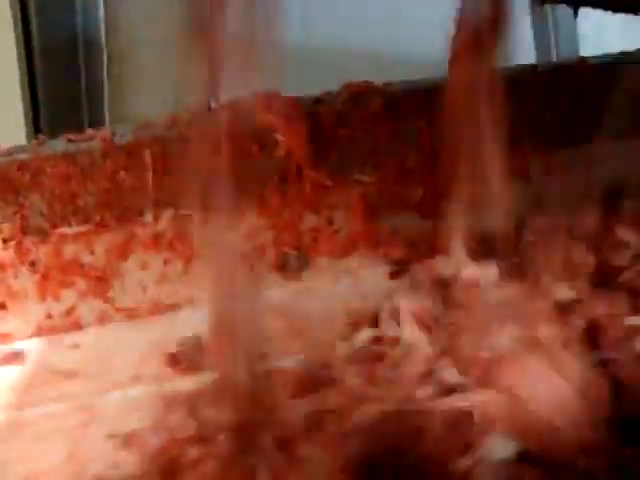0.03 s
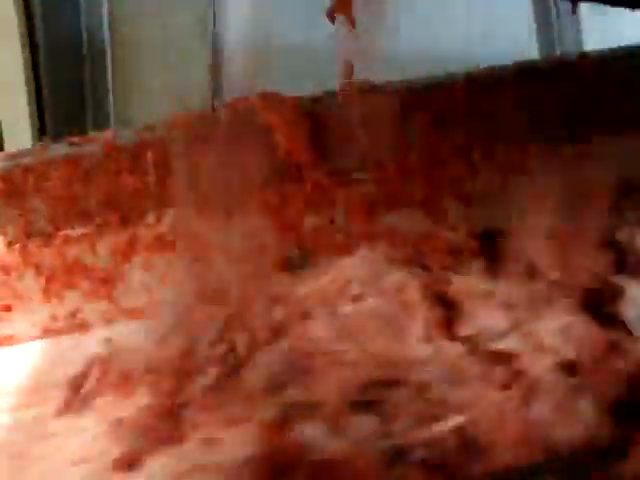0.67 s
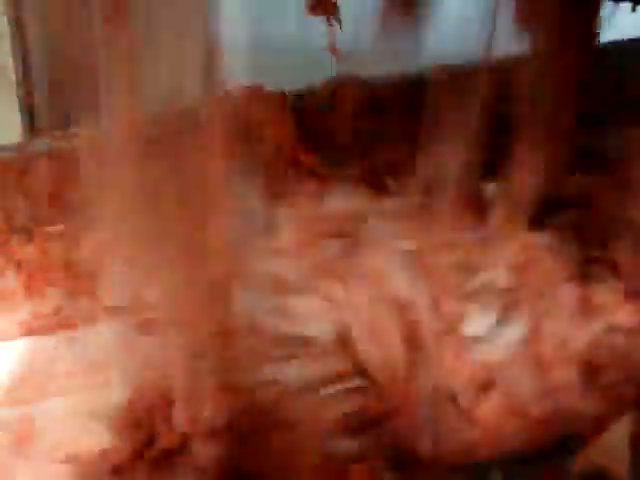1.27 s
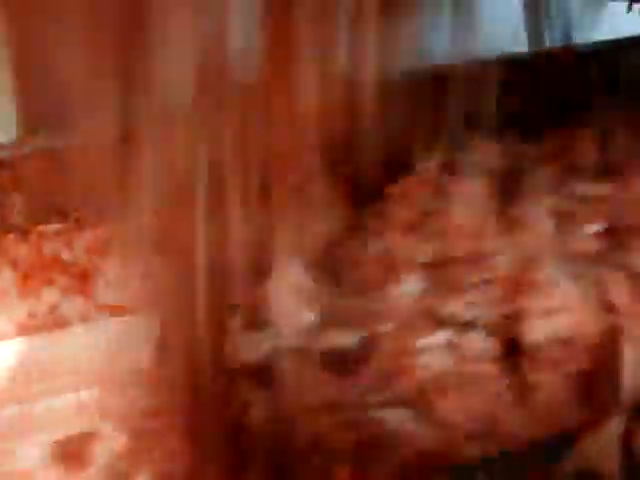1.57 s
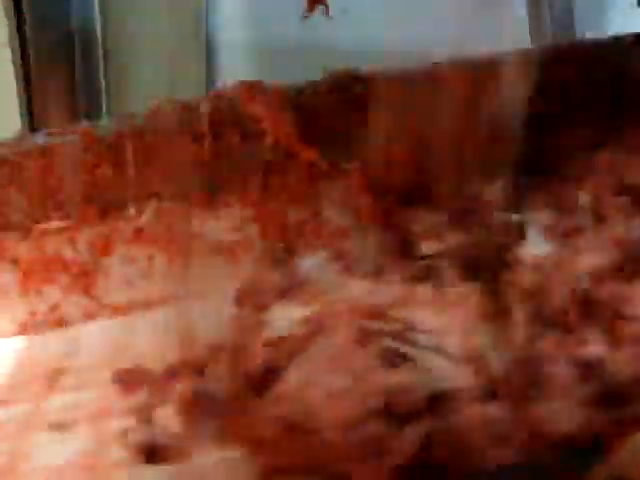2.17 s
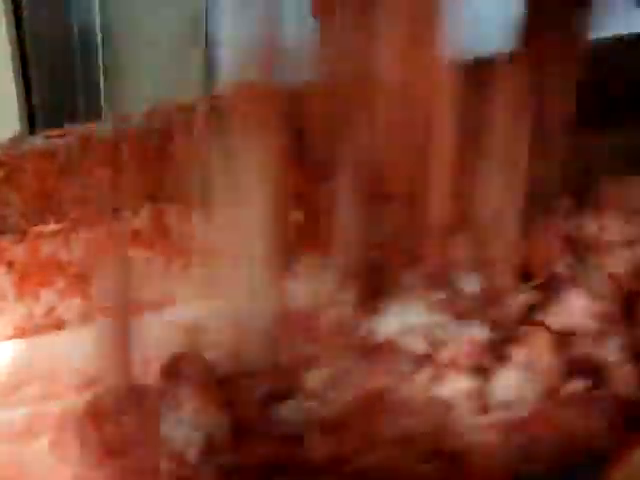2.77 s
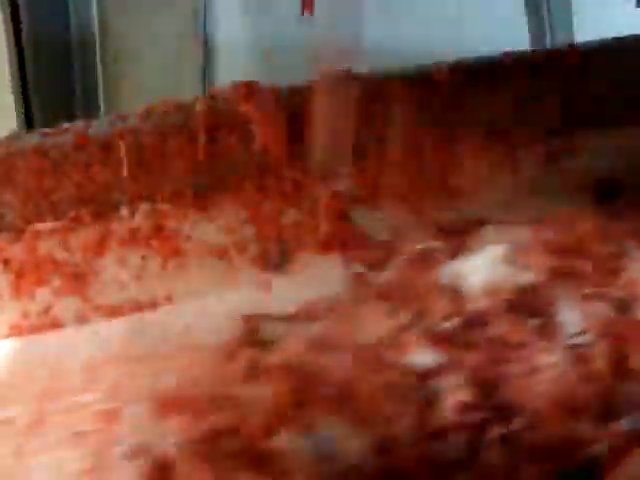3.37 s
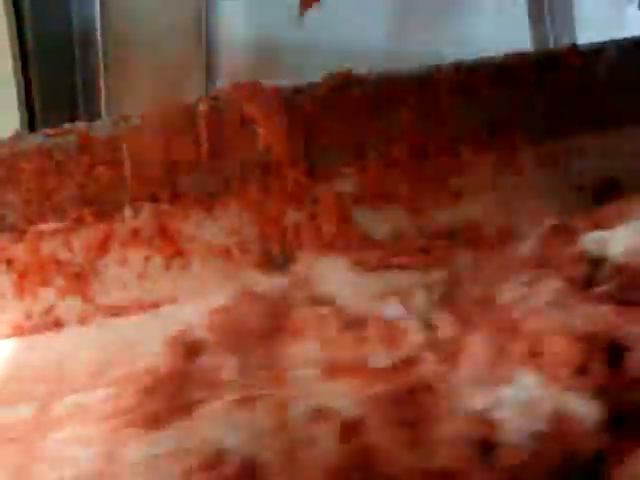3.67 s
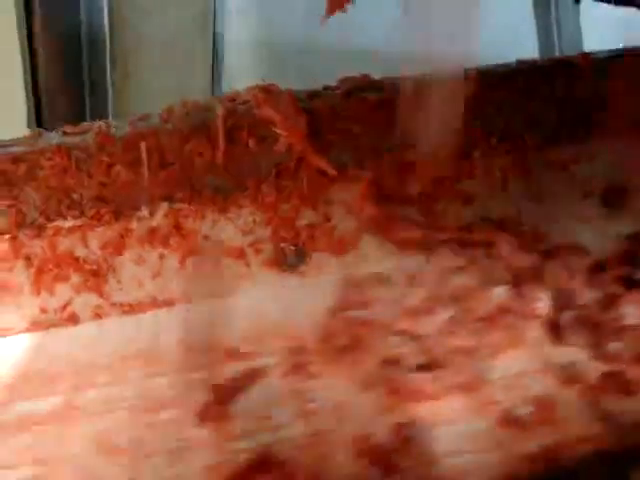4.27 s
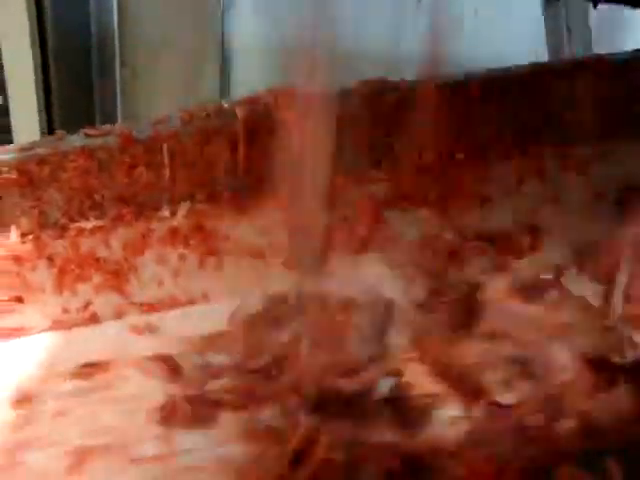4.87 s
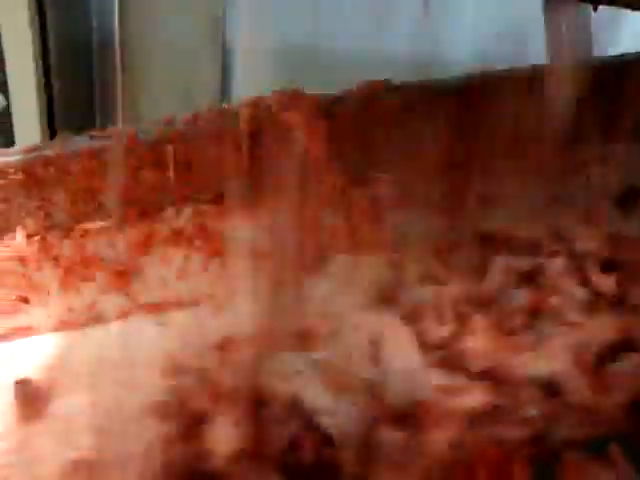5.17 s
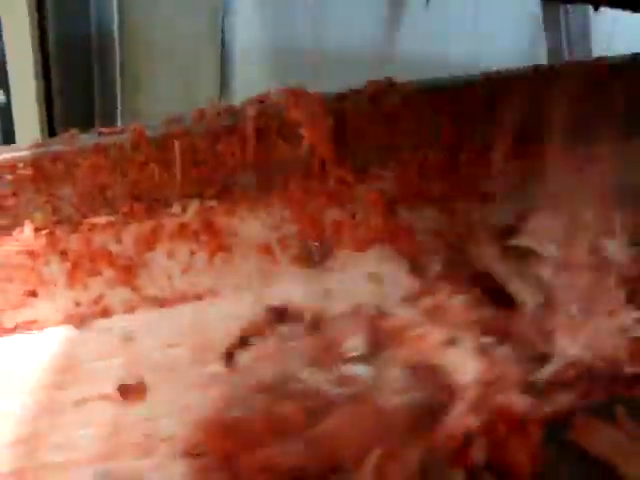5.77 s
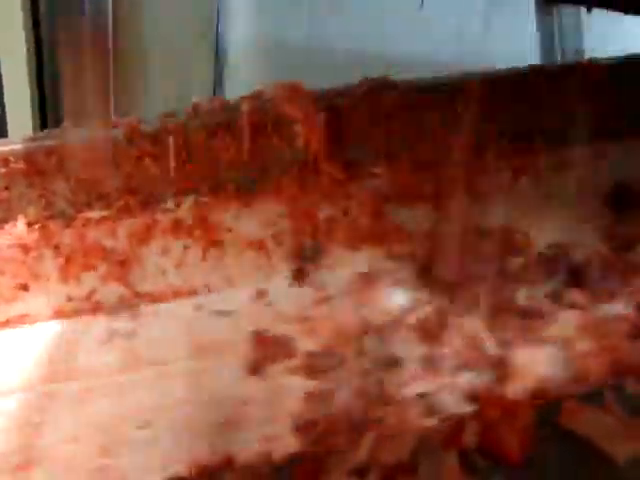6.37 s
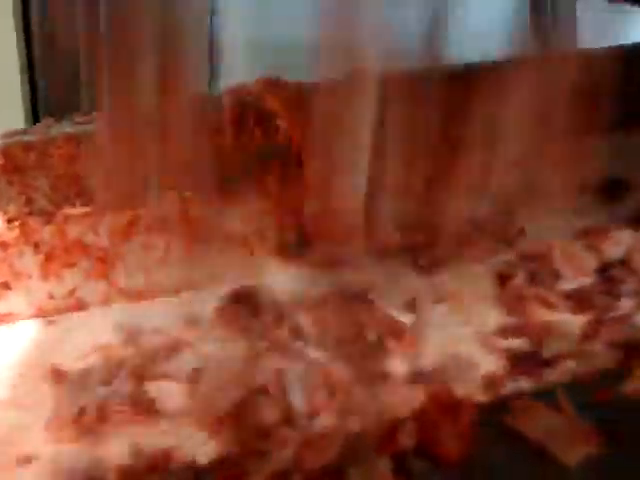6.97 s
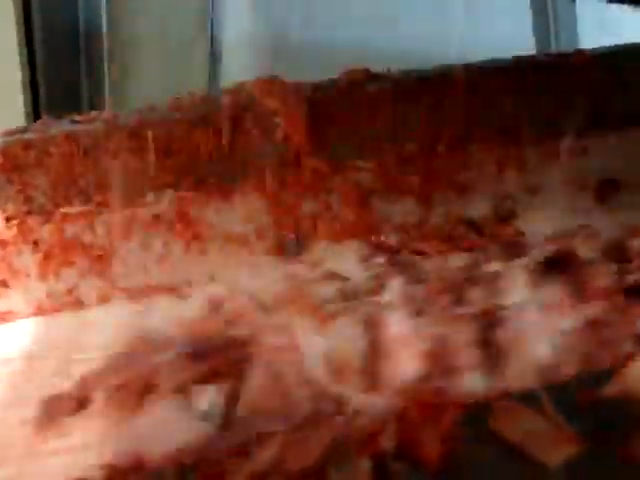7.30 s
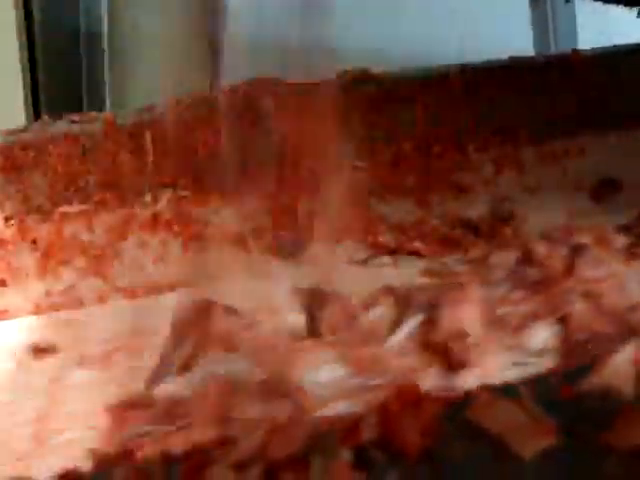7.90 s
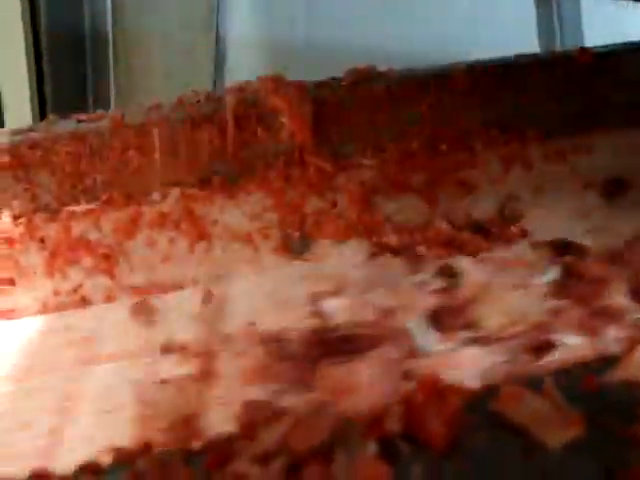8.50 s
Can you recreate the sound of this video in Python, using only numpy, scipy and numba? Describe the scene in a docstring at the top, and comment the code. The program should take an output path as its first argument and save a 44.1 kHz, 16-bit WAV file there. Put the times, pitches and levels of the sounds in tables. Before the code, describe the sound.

Wet scraps splatter and thud into a steel hopper in surges, bones knocking, over a grinder's steady drone.

```python
"""A wet roar comes first: load after load of meat and bone scraps pours into a running twin-shaft grinder.
The roar is countless small splats merging. Big lumps slap down, bones knock, juice spatters and squirts.
The scraps land in the hopper, a steel funnel whose ringing walls colour the impacts.
The machine drones underneath, and a hard-walled hall answers with a short echo."""
import sys
import numpy as np
from scipy import signal
from scipy.fft import rfft, irfft
from scipy.io import wavfile
from scipy.ndimage import uniform_filter1d
from numba import njit

SR = 44100
rng = np.random.default_rng(int(sys.argv[2]) if len(sys.argv) > 2 else 0)


def master(y):
    """Save y as 16-bit WAV."""
    cut = np.clip(np.atleast_2d(y).T, -1, 1)
    pcm = np.round(cut * 32767)  # scale
    wavfile.write(sys.argv[1], SR, pcm.astype(np.int16))


N = 376613

# Levels in the tables are relative: the functions below turn them up or down in the mix.
# The hum of the motor and gears. Each row: pitch in Hz, level in dB.
DRIVE_TONES = [(212, -52), (234, -49), (512, -49), (668, -47)]
# The tone colours of four noises. Each row: frequency in Hz, level in dB.
GEAR_COLOUR = [(25, -17), (70, -15), (115, -13.5), (150, -1), (210, -0.5), (420, 3), (650, 7.5), (790, 1),
               (950, 9), (1500, 5.5), (3000, -4.5), (10000, -59)]  # turning shafts and gears
THUD_COLOUR = [(70, -28), (115, -28), (150, -9), (215, 2.5), (280, 4), (420, -0.5), (650, 7.5), (790, 0),
               (1000, 1.5), (1600, -5.5), (4000, -46)]  # scraps landing on the heap
SPATTER_COLOUR = [(1500, -33.5), (3500, 4.5), (5000, 3), (7500, -0.5), (10000, -7)]  # flying juice
SPLAT_COLOUR = [(120, -49.5), (250, -16.5), (480, -15), (790, -7), (900, -7), (1200, -4), (1450, -3),
                (1800, -3.5), (2600, 0.5), (3300, -4.5), (4500, -9), (6500, -20), (10000, -30)]  # meat hitting
# The notes the steel hopper rings at. Each row: pitch in Hz, width in Hz (narrow rings longer), level in dB.
HOPPER_NOTES = [(229.5, 9.7, -8.5), (519.5, 10.2, 3.5), (643, 31, -5), (703, 52, -6), (740, 48, -10),
                (890, 24, 2), (942, 58, -1), (1025, 63, 0.5), (1118, 41, -1), (1207, 80, -3.5),
                (1336, 76, -8.5), (1633, 37, -3.5), (1983, 110, -5.5)]
# Air and juice squeezed out of a pocket. Each row: start in seconds, pitch in Hz, level in dB.
JUICE_SQUIRTS = [(0.27, 2100, -18), (0.603, 5900, -14), (1.858, 2100, -12), (2.014, 4560, -16.5),
                 (3.313, 4370, -18.5), (6.048, 5400, -18), (6.096, 2080, -16), (6.149, 1420, -16.5),
                 (6.272, 2150, -16), (6.862, 6940, -21), (7.089, 1500, -12), (7.74, 1960, -8.5),
                 (7.855, 5560, -18.5), (8.02, 2280, -8.5)]
# Bones striking the steel. Each row: start in seconds, level in dB, pitch of the bone in Hz.
BONE_KNOCKS = [(0.1933, 0, 1100), (0.7863, -4, 2600), (1.143, -6, 1300), (2.7726, -9, 1900),
               (2.9142, -2, 1970), (3.147, -3, 2250), (3.9093, -4, 2940), (4.2397, -7, 2400),
               (4.7856, -4, 1310), (5.932, 5.5, 1400), (5.951, 10, 880), (7.2665, -1, 2640),
               (7.2787, 1, 2440), (7.454, -5, 1390), (7.546, 3, 2160), (7.855, -3, 2390), (8.018, -2, 2000),
               (8.161, -4, 1700), (8.333, -2, 1870), (8.493, -7, 1200)]
# Big lumps slapping down. Each row: time in seconds, level in dB, spatter in dB relative to that level,
# pitch of the trapped air in Hz.
LUMP_SLAPS = [(0.264, 4, -30, 2020), (0.676, -9, -8, 980), (0.775, -2, -34, 1070), (1.042, -2.5, -31, 1130),
              (1.108, 5.5, -39, 1090), (1.359, 1, -17, 2060), (1.851, -1, -22, 2130),
              (1.975, -17.5, 0.5, 2660), (2.01, -13, -10, 2660), (2.041, -0.5, -22, 996),
              (2.141, -10, -17, 1040), (2.233, 0, -15, 1100), (2.294, -1, -17.5, 1260),
              (2.395, 3, -34, 1020), (2.483, -3, -27, 960), (2.604, 1, -19, 1308), (2.698, 1.5, -22, 980),
              (2.768, 0, -26, 940), (2.815, -2.5, -16, 1110), (2.912, -2, -29, 1220),
              (3.008, -1, -17, 1010), (3.045, -9, -26, 1510), (3.193, -7, -8.5, 1340),
              (3.25, 1.5, -24, 1500), (3.297, -5, -19, 1680), (3.357, -1.5, -26, 2090),
              (3.438, -15.5, -10, 1500), (3.529, -3.5, -13.5, 2030), (3.583, -10, -7, 1020),
              (3.773, -5, -19, 2020), (3.814, -4.5, -11, 1970), (3.946, -14, -7.5, 990),
              (4.055, -1.5, -15.5, 920), (4.084, 2.5, -25, 3370), (4.236, -10, -14, 1270),
              (4.374, -6, -19, 2900), (4.677, 2, -21, 945), (4.784, 3.5, -23, 1070),
              (4.995, -2.5, -17.5, 2040), (5.409, -0.5, -16, 3680), (5.703, 2.5, -37, 1280),
              (5.824, -2, -17, 1210), (5.95, -2, -12, 990), (6.088, 1, -17, 2060), (6.181, -4, -21, 1680),
              (6.265, -9, -23, 2150), (6.388, -3, -12.5, 1180), (6.448, -1.5, -18, 1090),
              (6.62, -2, -30, 1090), (6.728, 2, -25, 2450), (7.004, -4, -22, 1240), (7.087, -1, -36, 1400),
              (7.175, -4.5, -24, 1600), (7.225, -6.5, -15, 2430), (7.359, -7, -15.5, 2380),
              (7.393, -8.5, -11, 1010), (7.453, -0.5, -31, 1130), (7.543, 2.5, -17, 1200),
              (7.689, 4.5, -30, 1220), (7.909, -3, -12, 1160), (7.941, 1.5, -20.5, 1160),
              (8.018, -7.5, -8.5, 1970), (8.048, 1, -23, 1060), (8.21, -7, -20, 1930),
              (8.335, -10, -14, 1840), (8.412, -2, -24, 2250), (8.492, -9, -17, 950)]
# Loads of scraps tipping in. Each row: start in seconds, length in seconds, splat level in dB,
# spatter in dB relative to the splats, thud level in dB, wall ringing in dB.
LOADS = [(0.0, 0.46, -14.5, -13.5, -22.5, -18), (0.507, 0.2, -16, -16.5, -26.5, -27),
         (0.82, 0.34, -15, -14, -20, -19), (1.172, 0.3, -13.5, -15, -24, -20),
         (1.513, 0.2, -11.5, -14, -22.5, -25), (1.759, 0.13, -15.5, -9, -30, -21.5),
         (2.05, 0.099, -20, -11, -26, -26), (2.261, .15, -14.5, -15, -24.5, -28),
         (2.547, 0.16, -17.5, -10.5, -27.5, -21), (2.796, 0.072, -19.5, -4, -50, -36),
         (3.158, 0.17, -26.5, -3, -34, -39), (3.522, 0.18, -12.5, -12.5, -26, -26),
         (4.046, 0.35, -14.5, -10, -41, -24.5), (4.462, .14, -14, -10.5, -39, -27),
         (4.696, 0.23, -15.5, -9.5, -31, -26.5), (4.947, 0.28, -15.5, -11, -33, -27),
         (5.255, .16, -14, -12.5, -33, -29), (5.477, 0.11, -13, -10.5, -29, -36),
         (5.65, 0.23, -19.5, -12.5, -25, -34), (5.983, 0.14, -14, -10.5, -30, -29),
         (6.428, 0.2, -12, -11, -30, -24.5), (6.687, 0.13, -17.5, -9, -48, -39),
         (6.914, 0.17, -16.5, -11.5, -28, -24.5), (7.563, 0.16, -12, -13, -34, -30),
         (7.889, 0.13, -17, -19, -35, -41), (8.465, 0.052, -17.5, -9, -28, -24)]
# Scraps that keep dribbling between loads. One row: the same four levels in dB as a load has.
DRIBBLE = (-22.5, -10, -31.5, -33)


def undb(db):
    """Turn decibels into a number to multiply a sound by."""
    return 10 ** (np.asarray(db) / 20)


def unit(x):
    """Scale a signal so its average power is 1."""
    return x / np.sqrt(np.mean(x ** 2))


def add(track, start_s, sound):
    """Mix a sound into the track at the given time."""
    start = max(int(start_s * SR), 0)
    track[start:start + len(sound)] += sound[:max(N - start, 0)]


def colour(x, points, size=4096):
    """Give a sound a tone colour from a table; white noise keeps its power."""
    hz, db = np.transpose(points)
    bin_hz = np.fft.rfftfreq(size, 1 / SR)
    log_gain = np.log(undb(np.interp(np.log(bin_hz + 1), np.log(hz), db)))
    cepstrum = irfft(log_gain)[:size // 2]  # this makes the filter ring after a hit, never before
    cepstrum[1:] *= 2
    response = irfft(np.exp(rfft(cepstrum, size)))[:size // 2]
    return signal.oaconvolve(x, response / np.linalg.norm(response))[:len(x)]


def resonate(x, hz, width_hz):
    """Let a sound ring at one pitch."""
    return signal.lfilter(*signal.iirpeak(hz, hz / width_hz, fs=SR), x)


def squelch(x, hz, width_hz):
    """Ring twice over to single out a pitch more sharply, as a wet air pocket does."""
    return resonate(resonate(x, hz, width_hz), hz, width_hz)


def wander(per_s):
    """A smooth random curve that typically strays about 1 from zero."""
    hold = int(SR / per_s)
    steps = np.repeat(rng.standard_normal(N // hold + 1), hold)
    return unit(uniform_filter1d(steps, hold)[:N])


def shower(per_s, spread_db, decay_s):
    """Impacts of random size come at random times, each starting a fading burst of noise."""
    hits = rng.random(N) < per_s / SR
    sizes = undb(spread_db * np.clip(rng.standard_normal(N), -2, 2))
    fade = np.exp(-2 / (decay_s * SR))
    power = signal.lfilter([1], [1, -fade], (hits * sizes) ** 2 + 1e-12)
    return unit(np.sqrt(power) * rng.standard_normal(N))


def hall(x, fade_s=0.092, gap_s=0.007, dull_hz=3500):
    """The nearest hard walls send back a short, blurred echo, duller than the direct sound."""
    t = np.arange(SR) / SR
    tail = rng.standard_normal(SR) * undb(-60 * t / fade_s) * (t > gap_s)
    tail = signal.lfilter(*signal.butter(1, dull_hz, fs=SR), tail / np.linalg.norm(tail))
    return signal.fftconvolve(x, tail)[:N]


def drive(waver_radians=1.6):
    """Motor and gear tones waver under the uneven load, over the steady noise of the gears."""
    t = np.arange(N) / SR
    tones = 0
    for hz, db in DRIVE_TONES:
        level = undb(db + 1.3 * wander(per_s=3.8))
        tones += level * np.sin(2 * np.pi * hz * t + waver_radians * wander(per_s=14))
    return tones + undb(-31) * colour(rng.standard_normal(N), GEAR_COLOUR)


def hopper(x):
    """An impact is heard both directly and through the ringing steel."""
    ring = sum(undb(db) * resonate(x, hz, width_hz) for hz, width_hz, db in HOPPER_NOTES)
    return x + undb(-1.5) * ring


def wall_clatter(ringing):
    """Scraps strike ever different spots on the hopper, so each note clatters in its own rhythm."""
    ring = 0
    for hz, width_hz, db in HOPPER_NOTES:
        strikes = shower(per_s=30, spread_db=2.5, decay_s=0.0042)
        ring += undb(db) * resonate(strikes, hz, width_hz)
    return ringing * unit(colour(ring, SPLAT_COLOUR))


def heap(weight):
    """Scraps land on the heap over the shafts with soft, overlapping thuds."""
    thuds = shower(per_s=240, spread_db=0.5, decay_s=0.011)
    return weight * undb(-3) * colour(thuds, THUD_COLOUR)


def squirts(rise_s=0.004, width_hz=800):
    """Air and juice shoot out of a pocket in a brief squelch that swells and dies."""
    out = np.zeros(N)
    t = np.arange(SR // 12) / SR
    swell = t / rise_s * np.exp(1 - t / rise_s)
    for start_s, hz, db in JUICE_SQUIRTS:
        jet = unit(squelch(rng.standard_normal(len(t)), hz, width_hz))
        add(out, start_s, undb(db) * jet * swell)
    return out


def bones(width_hz=2400, snap_s=0.0014, rattle_s=0.0071):
    """A bone lands with a ragged snap around its own pitch, then rattles as it settles in the meat."""
    clack, rattle = np.zeros((2, N))
    t = np.arange(SR // 20) / SR
    for start_s, db, hz in BONE_KNOCKS:
        snap = squelch(rng.standard_normal(len(t)) * np.exp(-t / snap_s), hz, width_hz)
        add(clack, start_s, undb(db - 2.5) * snap / np.max(np.abs(snap)))
        settling = rng.standard_normal(len(t)) * np.exp(-t / rattle_s)
        add(rattle, start_s, undb(db - 15.5) * settling)
    return clack + colour(rattle, SPLAT_COLOUR)


def lumps(press_s=0.0052, flatten_s=0.018, width_hz=500):
    """A big lump presses in and flattens, squeezing out air and spraying juice."""
    body, air, spray = np.zeros((3, N))
    t = np.arange(SR // 4) / SR
    for time_s, db, wet_db, hz in LUMP_SLAPS:
        touch_s = time_s - press_s  # its soft edge arrives ahead of its bulk
        push = undb(db) * (1 - np.exp(-(t / press_s) ** 2)) * np.exp(-t / flatten_s)
        pocket = unit(squelch(rng.standard_normal(len(t)), hz, width_hz))
        add(body, touch_s, push)
        add(air, touch_s, push * pocket)
        add(spray, touch_s, push * undb(wet_db))
    slap = colour(body * rng.standard_normal(N), SPLAT_COLOUR)
    splash = colour(spray * rng.standard_normal(N), SPATTER_COLOUR)
    return undb(-12) * slap + undb(-15) * air + undb(4) * splash


def pops(low_hz, high_hz, per_s, sharpness, spread_db, decay_s, sizes=12):
    """Air pockets burst, each size with a brief pitch of its own."""
    out = 0
    for hz in np.geomspace(low_hz, high_hz, sizes):
        bursts = shower(per_s / sizes, spread_db, decay_s)
        out += unit(squelch(bursts, hz, hz / sharpness))
    return unit(out)


def pouring(rise_s=0.024, fall_s=0.068, thinning_db_per_s=0.5):
    """Volume curves for splats, spatter, thuds and ringing: loads swell and fade over a dribble."""
    def powers(db, wet_db, thud_db, ring_db):
        return undb([db, db + wet_db, thud_db, ring_db]) ** 2
    supply = undb(-thinning_db_per_s * np.arange(N) / SR)  # the dribble thins as the supply runs down
    power = np.outer(powers(*DRIBBLE), supply ** 2)
    t = np.arange(SR) / SR
    for start_s, length_s, *levels_db in LOADS:
        swell = np.minimum(t / rise_s, 1)
        fade = np.exp(-np.maximum(t - length_s, 0) / fall_s)
        for track, size in zip(power, powers(*levels_db)):
            add(track, start_s, size * (swell * fade) ** 2)
    return np.sqrt(power)


def scraps(flow, wet):
    """The main roar: small scraps splat, trapped air pops and juice crackles as the loads pour in."""
    splats = colour(shower(per_s=460, spread_db=3.5, decay_s=0.0082), SPLAT_COLOUR)
    pockets = pops(low_hz=1000, high_hz=4400, per_s=400, sharpness=7, spread_db=4, decay_s=0.006)
    droplets = shower(per_s=300, spread_db=6.5, decay_s=0.0045)
    bubbles = pops(low_hz=4250, high_hz=9160, per_s=340, sharpness=6, spread_db=2, decay_s=0.005)
    meat = undb(-4.5) * splats + undb(-9.5) * pockets
    juice = colour(droplets, SPATTER_COLOUR) + undb(-1.5) * bubbles
    clumps_db = 0.57 * wander(per_s=36)  # the scraps fall in clumps
    return undb(clumps_db) * (flow * meat + wet * juice)


def scene():
    """Everything lands in the hopper of the droning machine, and the hall surrounds it."""
    flow, wet, weight, ringing = pouring()
    impacts = scraps(flow, wet) + lumps() + bones() + heap(weight)
    near = hopper(impacts) + wall_clatter(ringing) + squirts() + drive()
    return (near + undb(-17.5) * hall(near))[None]


@njit
def follow(size, rise_s, fall_s):
    """Track how loud a sound is, rising at one speed and sinking at another."""
    out, level = np.empty(len(size)), 0.
    for i in range(len(size)):
        lag_s = rise_s if size[i] > level else fall_s
        level += (size[i] - level) / (lag_s * SR)
        out[i] = level
    return out


def record(dry, threshold_db=-9, squeeze_ratio=1.55, low_cut_hz=90, high_cut_hz=10050):
    """An automatic volume control evens out loud surges; peaks are rounded, bass and top are cut."""
    level = follow(np.abs(dry[0]), rise_s=0.00022, fall_s=0.014)
    gain = np.maximum(level / undb(threshold_db), 1) ** (1 / squeeze_ratio - 1)
    rounded = 0.92 * np.tanh(1.15 * gain * dry)
    thinned = signal.lfilter(*signal.butter(1, low_cut_hz, "high", fs=SR), rounded)
    steep_cut = signal.ellip(12, 0.1, 85, high_cut_hz, fs=SR, output="sos")
    return signal.sosfilt(steep_cut, thinned)


dry = scene()
out = record(dry)
master(out)
```